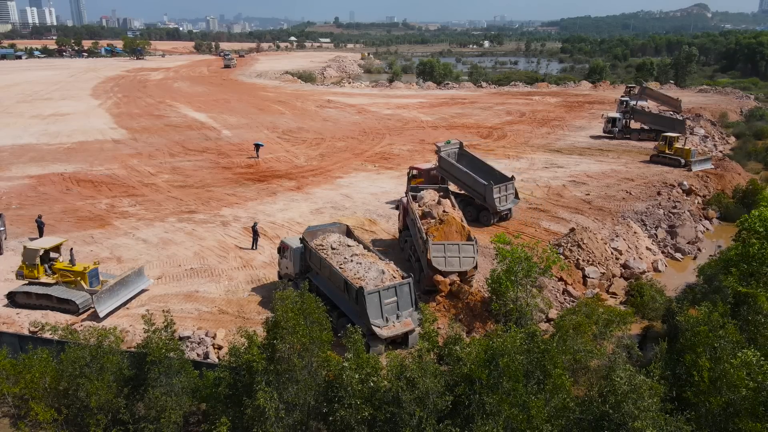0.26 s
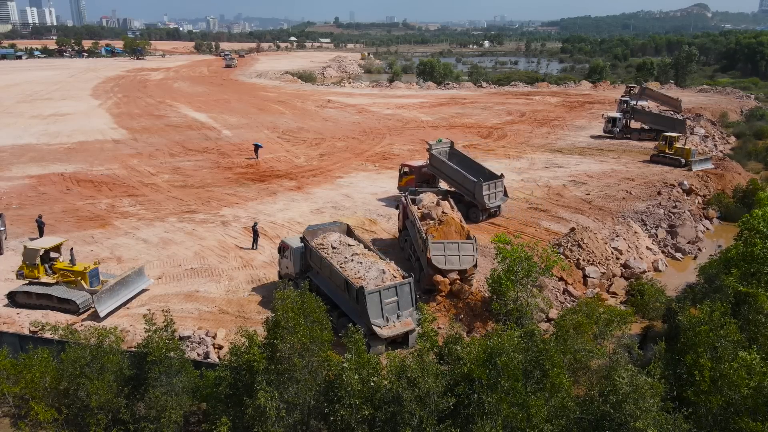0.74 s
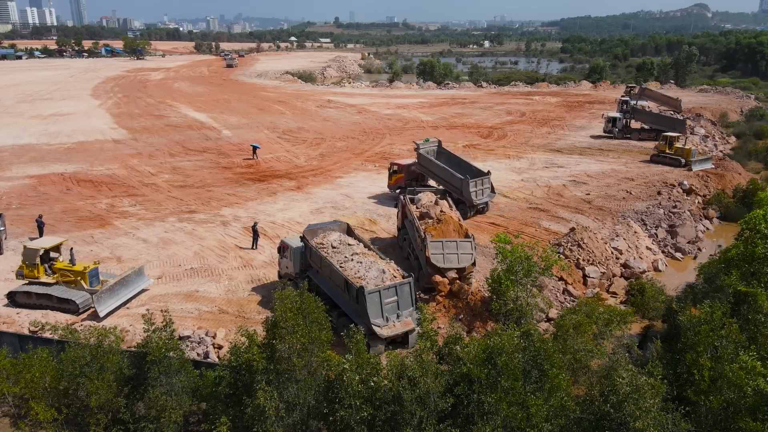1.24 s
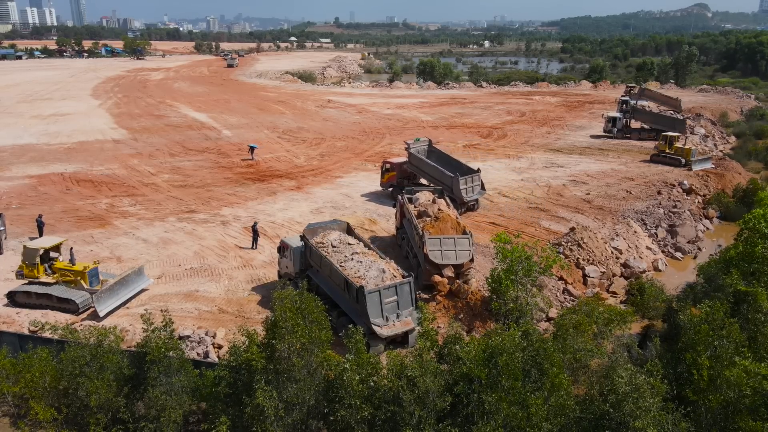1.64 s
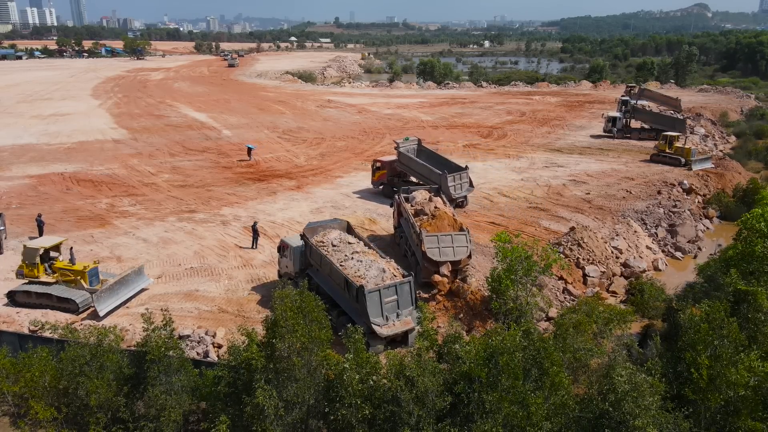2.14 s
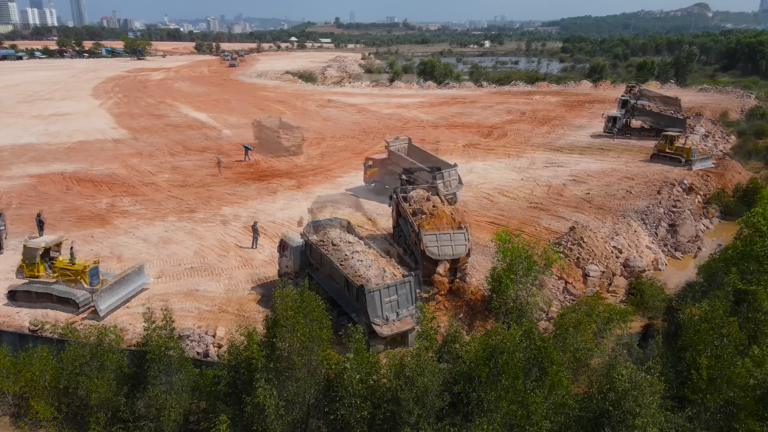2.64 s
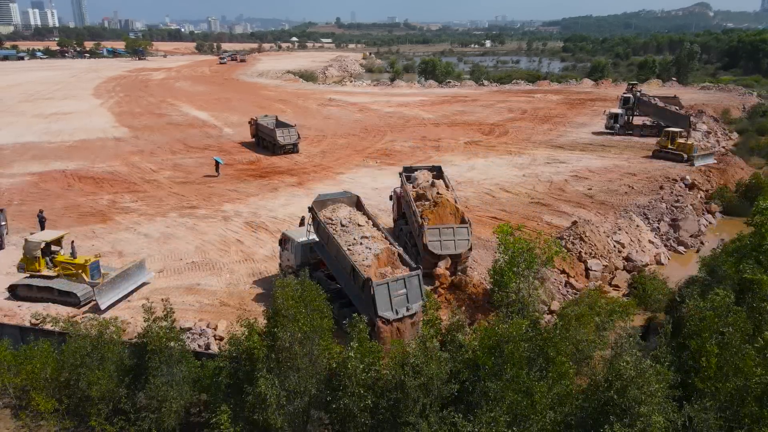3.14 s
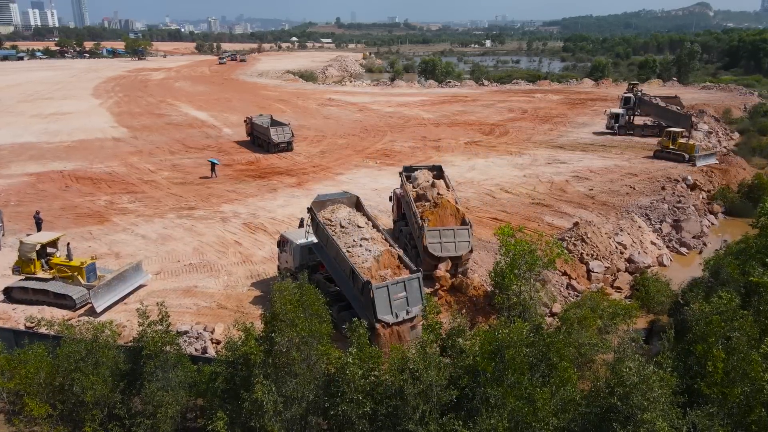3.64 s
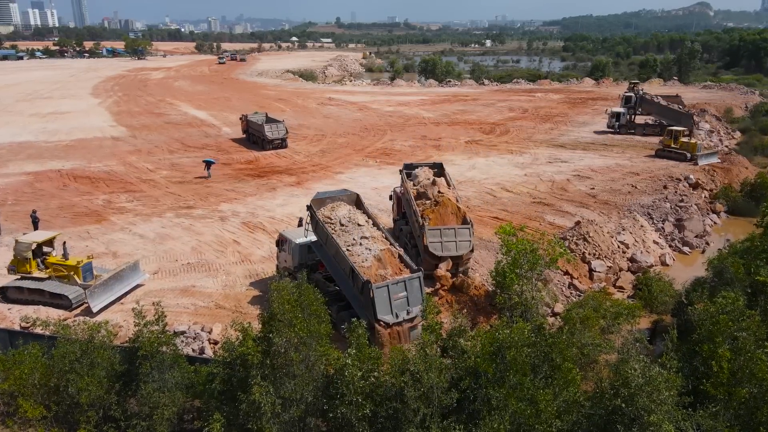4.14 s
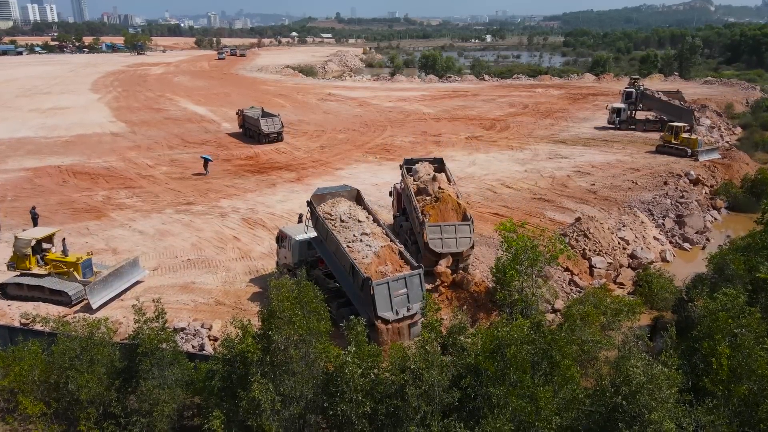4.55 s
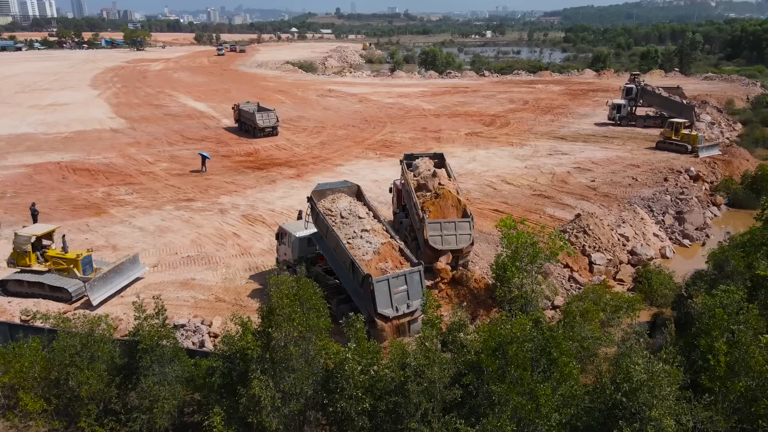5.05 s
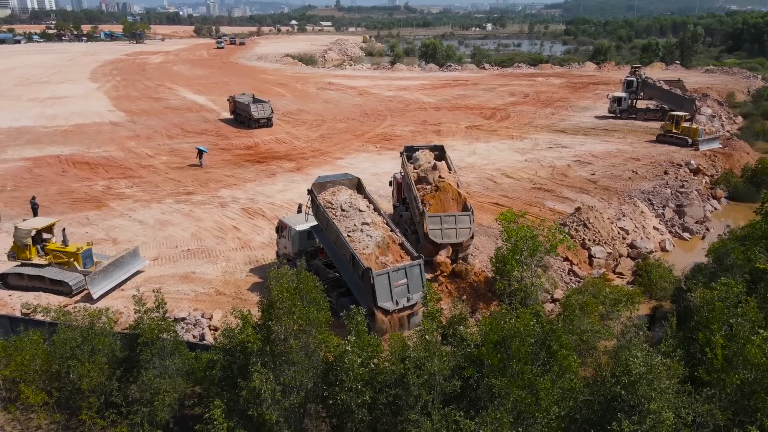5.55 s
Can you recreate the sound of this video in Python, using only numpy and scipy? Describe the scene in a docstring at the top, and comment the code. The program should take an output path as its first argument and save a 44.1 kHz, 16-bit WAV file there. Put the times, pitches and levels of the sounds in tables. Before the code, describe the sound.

Diesel dump trucks idle outdoors while loads of rock and earth scrape down steel beds and crash in heavy heaps.

```python
"""Dump trucks tip rock and earth down a bank on an open site, heard by a stereo microphone.
From the start two six-cylinder diesels throb near idle; blocks clatter and soil hisses off to the right.
Rock scrapes along a steel bed, stones clack, and at 1 s the biggest heap crashes down, boulders thudding
and the truck body booming. A loose tailgate clanks at 2.6 s, just ahead of another heap. Then the rising
bed's hinge squeaks until a last heap lands at 4.8 s. Every fall echoes dully off the earth banks."""
import sys
import numpy as np
from scipy import signal
from scipy.fft import rfft, irfft, next_fast_len
from scipy.io import wavfile
from scipy.ndimage import uniform_filter1d, map_coordinates

SR = 44100
rng = np.random.default_rng(int(sys.argv[2]) if len(sys.argv) > 2 else 0)


def master(y):
    """Save y as 16-bit WAV."""
    cut = np.clip(np.atleast_2d(y).T, -1, 1)
    pcm = np.round(cut * 32767)  # scale
    wavfile.write(sys.argv[1], SR, pcm.astype(np.int16))


N = 255339

# The open site's echo. Each row: frequency in Hz, t60 (time to fall 60 dB) in seconds.
SITE_DECAY = [(100, 0.85), (500, 0.82), (2000, 0.1), (9000, 0.29)]
# The machines stand to the right. Each row: frequency in Hz, lead of the right channel in radians.
RIGHT_LEAD = [(30, 0), (200, 0.1), (690, 2.07), (1400, 3), (2300, 4.5), (4300, 5.5), (6000, 6.5), (7200, 6),
              (8700, 4), (9800, 10), (10700, 8), (11300, 12.5)]
# Stereo width at the microphone. Each row: frequency in Hz, left-right likeness from -1 to 1.
MACHINE_LIKENESS = [(60, 1), (130, 0.88), (270, 0.87), (600, 0.53), (1400, 0.52), (2400, 0.89),
                    (5000, 0.51), (6800, 0.39), (8300, 1), (10300, 1)]
ROCK_LIKENESS = [(150, 1), (350, 0.94), (1000, 0.9), (3000, 0.081), (6500, 0.86), (8800, 0.85),
                 (10000, -0.99)]

# The colour of each noise or pulse. Each row: frequency in Hz, relative spectral density in dB.
SOIL_SPECTRUM = [(1500, -4), (3000, 5.5), (4400, 6), (5500, 4.5), (6600, -1), (8300, 4.5), (10500, 4.5),
                 (11400, -2)]
RUMBLE_SPECTRUM = [(20, -11.5), (35, -8), (50, -1), (70, 5.5), (105, 1.5), (135, -2.5), (175, 2),
                   (250, -15), (400, -18.5), (800, -47.5)]
CLATTER_SPECTRUM = [(130, -29), (220, -3.5), (290, -6), (450, -5.5), (700, -8), (1050, -8), (1500, -13),
                    (2200, -15.5), (3000, -26.5), (4000, -37), (5200, -63), (8800, -68)]
SCRAPE_SPECTRUM = [(180, -5), (300, -3), (520, 2.5), (750, 0.5), (1060, -2.5), (1350, -1), (2200, -5.5),
                   (3200, -17), (4300, -15.5), (8900, -18), (11400, -17)]
GRIND_SPECTRUM = [(1000, -24), (1700, 4), (2200, 8), (2700, 7), (3600, 2), (4400, -8), (5500, -20),
                  (9000, -35)]
STONE_CRUNCH_SPECTRUM = [(600, -0.5), (1250, 6.5), (2200, 1), (3000, -7), (4200, -24), (6000, -31),
                         (11000, -66)]
CLICK_SPECTRUM = [(1500, -36), (3000, 3), (4800, 4.5), (6500, -3.5), (9000, -2.5), (11500, -9)]
PUSH_SPECTRUM = [(25, -29.5), (70, 12.5), (130, 7), (250, -4.5), (600, -10), (1500, -38), (4000, -52),
                 (11000, -74)]
CRACK_SPECTRUM = [(60, -3), (300, -4), (700, 5), (1400, -7.5), (3000, -15), (6000, -15), (11000, -43)]
THUD_SPECTRUM = [(25, -7), (55, -31), (85, -19), (125, 7.5), (170, 1.5), (250, -8), (400, -12.5),
                 (900, -45)]
CLANG_SPECTRUM = [(180, -4.5), (300, 1.5), (480, -0.5), (680, -2.5), (800, -3.5), (1000, -7), (1400, -10.5),
                  (2000, -30), (4000, -71)]
HEAP_CRUNCH_SPECTRUM = [(600, 2.5), (1300, 7.5), (2100, 1.5), (3200, 5), (4200, -9), (6000, -37),
                        (11000, -66)]
SPRAY_SPECTRUM = [(1800, -11), (3500, 1), (5400, 0), (7000, -5.5), (9000, 2), (11400, -7.5)]

# Whine of the tipping pumps. Each row: pitch in Hz, level in dB.
PUMP_TONES = [(421, -52.5), (560, -64), (685, -54)]
# Earth trickling off the beds. Each row: time in seconds, level in dB.
SOIL_LEVELS = [(0, -46.5), (.9, -50), (2.0, -45.5), (2.3, -49), (2.85, -51), (3.9, -47), (4.35, -46.5),
               (4.5, -43.5), (5.1, -47.5), (5.79, -47.5)]
# The rising bed's hinge. Each row: middle in seconds, length in seconds, pitch in Hz, level in dB.
HINGE_SQUEAKS = [(3.285, .08, 4030, -52), (3.3, 0.15, 7960, -55), (3.915, .06, 5650, -53),
                 (3.966, .06, 6380, -56), (4.16, .045, 6280, -50), (4.207, .065, 6230, -48),
                 (4.215, .06, 5950, -54), (4.285, .07, 5730, -53), (4.484, .11, 4080, -50),
                 (4.535, .07, 5560, -53)]
# The farther truck's exhaust. Each row: harmonic of the firing rate, starting level in dB.
FAR_EXHAUST = [(2, -45), (3, -50)]
# The nearest exhaust. Each row: time in seconds, firing rate in Hz, second and third harmonics in dB.
NEAR_EXHAUST = [(0, 30.82, -34.5, -36.5), (1.1, 31.44, -34, -33), (2.2, 30.61, -35, -34.5),
                (4.4, 30.96, -32.5, -38.5), (5.79, 31.04, -31.5, -32.5)]
# Its weaker tones. Each row: multiple of the crankshaft rate, level in dB.
CRANK_ORDERS = [(5, -41), (7, -45.5), (8, -48), (10, -40.5), (11, -62), (12, -46), (15, -46), (16, -54.5),
                (17, -52), (21, -52.5)]
# Resonances of the engine covers and the steel bed. Each row: frequency in Hz, width in Hz, gain in dB.
COVER_MODES = [(558, 44, -7), (730, 91, -6), (810, 56, -26), (2726, 27, -2)]
BED_MODES = [(471, 23, -3), (656, 30, -9), (845, 27, -10), (960, 12, -14), (1113, 25, -3.5),
             (1344, 47, -11), (1626, 44, -7), (1906, 110, -2), (2106, 34, 0.5), (2265, 25, 2.5),
             (2470, 51, -8), (2560, 27, 3), (2980, 28, -10), (3140, 30, -6), (3790, 12, 3), (4140, 36, -22)]

# The tailgate hits its frame. Each row: start in seconds, level in dB.
GATE_BLOWS = [(2.638, -39.5), (2.648, -34), (2.681, -41)]
# The tailgate's ring. Each row: frequency in Hz, relative level in dB, t60 in seconds.
GATE_MODES = [(426.4, 4.5, 0.44), (590, -0.5, 0.67), (715, 0, 0.36), (1030, -16, 0.23), (1510, -20, .15),
              (2100, 4.5, 0.079), (2520, -9, .14), (2900, -6, 0.19), (3460, -18, 0.18)]
# Rock sliding on the bed. Each row: start and length in seconds, level in dB, fade in dB per second.
SLIDES = [(-.06, 0.84, -35.5, 12.5), (0.964, 0.19, -20, 29), (2.857, 0.26, -47, -2),
          (4.732, 0.15, -37.5, 5)]
# Rock grinding over the bed's lip. Each row: start in seconds, level in dB, t60 in seconds.
GRINDS = [(0.713, -43.5, 0.14), (0.981, -27.5, 0.55), (1.11, -34, 0.18), (2.635, -42, 0.09),
          (2.98, -38, 0.13), (4.824, -29, 0.12)]
# The louder single stones. Each row: start in seconds, knock, crunch and click in dB, t60 in seconds.
STONES = [(.062, -36, -35, -45, 0.057), (.124, -28.5, -34, -46, 0.17), (.154, -27, -50, -37.5, .06),
          (.213, -52, -48, -46, .025), (.252, -29, -47, -54, 0.087), (.33, -28, -55, -56, 0.042),
          (.412, -33.5, -40, -49, 0.076), (.476, -37, -36, -40, 0.072), (.484, -38, -47, -48, 0.046),
          (.553, -49, -38, -51, .06), (.64, -38, -39, -52, 0.047), (.692, -49, -45, -47, .04),
          (.712, -60, -37, -64, 0.26), (.771, -35, -59, -39.5, 0.075), (.788, -34.5, -47.5, -53, 0.29),
          (.948, -34, -35, -60, 0.28), (1.054, -41, -22, -24, 0.064), (2.639, -44, -39, -53, 0.041),
          (3.575, -50, -46, -41.5, 0.098), (3.757, -53, -58, -43.5, 0.052),
          (4.117, -48, -39.5, -36.5, 0.16), (4.597, -36.5, -42, -36, 0.1), (4.714, -36, -38.5, -62, 0.12),
          (4.76, -36, -32, -54, 0.35), (4.791, -24, -23.5, -52, 0.072), (4.816, -22, -31, -50, 0.06)]
# Bed panels struck by the heaps. Each row: start in seconds, pitch in Hz, level in dB, t60 in seconds.
PANEL_STRIKES = [(0.157, 484, -28, 0.33), (0.16, 314, -33.5, 1.3), (0.985, 903, -28.5, 0.64),
                 (1.057, 640, -20.5, 0.34), (1.07, 263, -26.5, 0.87), (2.96, 560, -31, 0.27),
                 (4.792, 1226, -27, 0.14), (4.796, 647, -23, 0.23)]
# Booms of the truck body. Each row: start in seconds, lowest mode in Hz, level in dB, t60 in seconds.
BODY_BOOMS = [(1.07, 118.1, -18.5, 0.57), (1.28, 150, -27, 0.3), (1.29, 84.4, -23.5, 0.31),
              (2.99, 132.2, -24.5, 0.64), (4.812, 160.2, -22, .4)]
# The body's modes. Each row: frequency ratio to the lowest, relative level in dB.
BODY_MODES = [(1, 0.5), (1.25, -1.5), (1.955, -10)]
# Boulders landing within the heaps. Each row: start in seconds, push in dB, crack in dB.
BOULDERS = [(0.1591, -17, -18), (0.175, -13.5, -24), (0.189, -16.5, -20), (1.065, -27, -7),
            (1.076, -19, -14), (1.0828, -8, -24), (1.096, -19, -24), (1.1375, -8.5, -28), (1.189, -18, -36),
            (1.317, -23, -44), (2.651, -34, -26), (2.68, -16.5, -38), (2.964, -24, -20),
            (3.004, -14.5, -19), (3.034, -23, -32), (4.798, -21, -19), (4.808, -26, -14), (4.821, -22, -17),
            (4.832, -19, -25), (4.862, -15, -30), (4.891, -15, -26)]
# Heaps crashing down. Each row: start in seconds, thud, clang, crunch and spray in dB, length factor.
HEAPS = [(0.155, -37, -28, -41, -40.5, 0.59), (1.052, -20.5, -22, -21.5, -27.5, 0.99),
         (1.284, -34, -49, -61.5, -70, 0.92), (2.637, -45, -32.5, -43, -44.5, 0.8),
         (2.956, -24, -25.5, -31.5, -37.5, 1.18), (4.789, -22.5, -24.5, -25.5, -37, 0.98)]


def amp(db):
    """Decibels to gain."""
    return 10 ** (np.asarray(db) / 20)


def unit(x):
    """Scale to rms 1."""
    return x / np.sqrt(np.mean(x ** 2) + 1e-20)


def along(points, hz):
    """(Hz, value) points read on a log axis."""
    f, v = np.transpose(points)
    return np.interp(np.log(hz + 1), np.log(f + 1), v)


def curves(rows):
    """One value per sample for each column after the time."""
    times, *columns = np.transpose(rows)
    return [np.interp(np.arange(N) / SR, times, column) for column in columns]


def wobble(rate):
    """A smooth random curve with rate knots a second."""
    return map_coordinates(rng.standard_normal(4096), [np.arange(N) * rate / SR + 2], mode="wrap")


def filtered(x, response):
    """x through a complex frequency response."""
    size = next_fast_len(N + SR // 2)
    return irfft(rfft(x, size) * response(np.fft.rfftfreq(size, 1 / SR)), size)[..., :N]


def coloured(pair, spectrum, likeness=ROCK_LIKENESS):
    """Two unrelated signals become a stereo sound of rms 1 with this spectrum and likeness."""
    def mid_side_gains(hz):
        angle = np.arccos(np.clip(along(likeness, hz), -1, 1)) / 2
        return amp(along(spectrum, hz)) * [np.cos(angle), np.sin(angle)]
    mid, side = filtered(pair, mid_side_gains)
    return unit(np.array([mid + side, mid - side]))


def grit(rate, spread_db):
    """Two noises broken into grains of uneven size, about rate a second."""
    return rng.standard_normal((2, N)) * amp(spread_db * np.clip(wobble(rate), -2, 2))


def patchy(pair, depth_db, size=512):
    """Narrow bands of the noise swell and sink at random, giving an uneven, fluttering texture."""
    bands = signal.stft(pair, nperseg=size)[2]
    swell = uniform_filter1d(rng.standard_normal(bands.shape[1:]), size=4, axis=0)
    swell = uniform_filter1d(swell, size=5, axis=1)
    return signal.istft(bands * amp(depth_db * unit(swell)), nperseg=size)[1][:, :N]


def wavering(x, depth_db, split_hz):
    """The treble of x swells and sinks a few times a second."""
    treble = filtered(x, lambda hz: hz ** 4 / (hz ** 4 + split_hz ** 4))
    return x + treble * (amp(depth_db * wobble(7.6) - 0.67) - 1)


def ringing(x, modes):
    """x plus the answer of each resonance."""
    return filtered(x, lambda f: 1 + sum(
        amp(db) * 1j * f * width / (hz * hz - f * f + 1j * f * width) for hz, width, db in modes))


def from_right(x):
    """The sound reaches the right side of the microphone first."""
    return filtered(x, lambda hz: np.exp(.5j * along(RIGHT_LEAD, hz) * np.array([[-1], [1]])))


def burst(start, rise, t60):
    """An envelope of peak 1 that swells and dies away; times in seconds."""
    t = np.maximum(np.arange(N) / SR - start, 0)
    shape = (1 - np.exp(-(t / rise) ** 2)) * np.exp(-np.log(1000) * t / t60)
    return shape / (shape.max() + 1e-12)


def pulse(spectrum, size=8192):
    """The causal pulse of peak 1 that has this spectrum."""
    cepstrum = irfft(np.log(amp(along(spectrum, np.fft.rfftfreq(size, 1 / SR)))))
    cepstrum[1:size // 2] *= 2
    cepstrum[size // 2 + 1:] = 0
    shape = irfft(np.exp(rfft(cepstrum)))
    return shape / np.abs(shape).max()


def tone(cycles, drift, flutter_db):
    """A sine of rms 1 whose phase (drift, in radians) and level wander."""
    phase = 2 * np.pi * (cycles + rng.random()) + drift * wobble(4)
    return unit(np.sin(phase) * amp(flutter_db * wobble(7)))


def bank_echo(x, delay_s=0.03):
    """Farthest off, the earth banks scatter back a dull tail whose bass is alike in both channels."""
    hz, t, bands = signal.stft(rng.standard_normal((2, N)), SR, nperseg=256)
    decay = np.exp(-np.log(1000) * t / along(SITE_DECAY, hz)[:, None])
    tail = signal.istft(bands * decay, SR, nperseg=256)[1][:, :N]
    tail = coloured(tail, [(60, -2), (160, 6.0), (9000, -0.5)])[:, :SR]
    tail = np.pad(tail / np.linalg.norm(tail[0]), ((0, 0), (round(delay_s * SR), 0)))
    return signal.fftconvolve(x, tail, axes=1)[:, :N]


def pumps():
    """The hydraulic pumps whine faintly and unsteadily in the background."""
    t = np.arange(N) / SR
    return sum(amp(db) * tone(hz * t, drift=1.0, flutter_db=2.0) for hz, db in PUMP_TONES)


def soil():
    """Off to the right, fine earth trickles from the beds in a grainy hiss."""
    grains = patchy(grit(600, spread_db=0.5), depth_db=2.5, size=2048) * amp(1.3 * wobble(23.51))
    return amp(curves(SOIL_LEVELS)[0]) * from_right(coloured(grains, SOIL_SPECTRUM, MACHINE_LIKENESS))


def hinge(sag_per_s=0.12):
    """Dry steel sticks and slips in short, slightly rough chirps that sag in pitch."""
    out = np.zeros(N)
    slips = np.cumsum(rng.normal(0, 0.06, N))  # uneven slipping blurs the pitch
    for middle, length, hz, db in HINGE_SQUEAKS:
        t = np.arange(N) / SR - middle
        active = np.abs(t) < length / 2
        t = t[active]
        cycles = hz * (t - sag_per_s * t ** 2 / 2)
        out[active] += amp(db) * np.cos(np.pi * t / length) * np.sin(2 * np.pi * cycles + slips[active])
    return out


def far_diesel(firing_hz=28.53, gain_db_per_s=0.8):
    """The farther truck idles slower, beats against the near one and grows steadily louder."""
    firings = np.cumsum(firing_hz + 0.668 * wobble(3)) / SR
    swell = amp(gain_db_per_s * np.arange(N) / SR)
    return swell * sum(amp(db) * tone(harmonic * firings, drift=0.99, flutter_db=1.5)
                       for harmonic, db in FAR_EXHAUST)


def near_diesel(hunt_hz=0.099):
    """Exhaust tones lock to the crankshaft; rumble and clatter pulse from the right at each firing."""
    firing_hz, second_db, third_db = curves(NEAR_EXHAUST)
    firings = np.cumsum(firing_hz + hunt_hz * wobble(2.59)) / SR  # the governor lets the rate wander
    turns = firings / 3  # six cylinders fire three times a turn
    exhaust = amp(second_db) * tone(2 * firings, drift=0.45, flutter_db=2.0)
    exhaust += amp(third_db) * tone(3 * firings, drift=0.32, flutter_db=0.5)
    for order, db in CRANK_ORDERS:  # unequal cylinders fill in the other orders
        exhaust += amp(db) * tone(order * turns, drift=0.82, flutter_db=4.0)
    beat = np.cos(2 * np.pi * firings)
    throb = grit(20, spread_db=0.5) * amp(2.3 * beat)
    rumble = amp(-36) * coloured(throb, RUMBLE_SPECTRUM, MACHINE_LIKENESS)
    rattle = patchy(grit(110, spread_db=1.0), depth_db=2.5, size=2048) * amp(0.14 * beat)
    clatter = amp(-37) * coloured(rattle, CLATTER_SPECTRUM, MACHINE_LIKENESS)
    clatter = wavering(clatter, depth_db=2.2, split_hz=2000)
    return exhaust + from_right(rumble + ringing(clatter, COVER_MODES))


def tailgate():
    """Each swing against the frame rings the loose gate anew; the dirt on it blurs and damps its modes."""
    out = np.zeros(N + SR)
    t = np.arange(SR // 2) / SR
    for start, db in GATE_BLOWS:
        for hz, mode_db, t60 in GATE_MODES:
            jitter = 0.069 * np.sqrt(hz / GATE_MODES[0][0])  # radians a sample; higher modes blur more
            phase = 2 * np.pi * (hz * t + rng.random()) + np.cumsum(rng.normal(0, jitter, len(t)))
            envelope = (1 - np.exp(-t / 0.0015)) * np.exp(-np.log(1000) * t / t60)
            level = amp(db + mode_db + rng.normal(0, 2.1))
            out[round(start * SR):][:len(t)] += level * envelope * np.sin(phase)
    return out[:N]


def slides(attack_s=0.023, t60=0.16):
    """Rock scrapes jerkily along the tilted bed: each slide gathers speed, runs on and stops."""
    level = np.zeros(N)
    for start, length, db, fade_db_per_s in SLIDES:
        t = np.maximum(np.arange(N) / SR - start, 0)
        attack = 1 - np.exp(-(t / attack_s) ** 2)
        release = np.exp(-np.log(1000) * np.maximum(t - length, 0) / t60)
        level += amp(db - fade_db_per_s * np.minimum(t, length)) * attack * release
    jerks = amp(0.33 * wobble(33.4))
    scrape = patchy(grit(600, spread_db=1.5), depth_db=5.0)
    return level * jerks * coloured(scrape, SCRAPE_SPECTRUM)


def grinds():
    """Hard rock grates over the steel lip in a short, bright, gravelly crunch."""
    level = sum(amp(db) * burst(start, rise=0.014, t60=t60) for start, db, t60 in GRINDS)
    gravel = patchy(grit(500, spread_db=2.0), depth_db=2.0)
    return level * coloured(gravel, GRIND_SPECTRUM)


def stones(pebble_count=4, pebble_t60=0.2):
    """Stray stones knock on the bed, crunch and scatter chips; so do faint pebbles in the first slide."""
    knock, crunch, click = np.zeros((3, N))
    slide_start, slide_length = SLIDES[0][:2]
    pebble_starts = slide_start + slide_length * rng.random(pebble_count)
    pebble_dbs = rng.normal(-49, 2, pebble_count)
    pebbles = [(start, db + 13.5, db, db, pebble_t60) for start, db in zip(pebble_starts, pebble_dbs)]
    for start, knock_db, crunch_db, click_db, t60 in list(STONES) + pebbles:
        blow = burst(start, rise=0.0022, t60=t60)
        knock += amp(knock_db) * blow
        crunch += amp(crunch_db) * blow
        click += amp(click_db) * burst(start - .002, rise=0.0037, t60=t60)  # the chips' clicks begin a little ahead of the knock
    knocks = knock * coloured(grit(200, spread_db=-3.0), CLANG_SPECTRUM)
    crunches = crunch * coloured(patchy(grit(360, spread_db=1.5), depth_db=4.5), STONE_CRUNCH_SPECTRUM)
    clicks = click * coloured(grit(650, spread_db=1.5), CLICK_SPECTRUM)
    return knocks + crunches + clicks


def panels(width_hz=92):
    """The heaps strike different panels of the bed, and each clangs at its own pitch."""
    out = np.zeros((2, N))
    for start, hz, db, t60 in PANEL_STRIKES:
        spectrum = [(hz / 2, -50), (hz - width_hz, -14), (hz, 0), (hz + width_hz, -14), (2 * hz, -50)]
        clang = coloured(rng.standard_normal((2, N)), spectrum)
        out += amp(db) * burst(start, rise=0.0085, t60=t60) * clang
    return out


def body_booms():
    """The truck's body booms under each heavy landing, each boom at its own low pitch."""
    t = np.arange(N) / SR
    out = np.zeros(N)
    for start, hz, db, t60 in BODY_BOOMS:
        ring = sum(amp(mode_db) * tone(ratio * hz * t, drift=0.52, flutter_db=0.0)
                   for ratio, mode_db in BODY_MODES)
        out += amp(db) * burst(start, rise=0.0083, t60=t60) * unit(ring)
    return out


def boulders():
    """Each boulder gives one dull, heavy push; a hard edge on steel adds a crack that rings the bed."""
    push_hits, crack_hits = np.zeros((2, N))
    for start, push_db, crack_db in BOULDERS:
        push_hits[round(start * SR)] += amp(push_db)
        crack_hits[round(start * SR)] += amp(crack_db)
    pushes = signal.fftconvolve(push_hits, pulse(PUSH_SPECTRUM))[:N]
    cracks = signal.fftconvolve(crack_hits, pulse(CRACK_SPECTRUM))[:N]
    return pushes + ringing(cracks, BED_MODES)


def heaps():
    """Each heap sprays chips, clangs on the bed and crunches; the heavy mass thuds last."""
    thud, clang, crunch, spray = np.zeros((4, N))
    for start, thud_db, clang_db, crunch_db, spray_db, stretch in HEAPS:
        thud += amp(thud_db) * burst(start + 0.016, rise=0.0093, t60=0.56 * stretch)
        clang += amp(clang_db) * burst(start, rise=0.0032, t60=0.51 * stretch)
        crunch += amp(crunch_db) * burst(start, rise=0.0072, t60=0.35 * stretch)
        spray += amp(spray_db) * burst(start, rise=0.00069, t60=0.46 * stretch)
    return (thud * coloured(grit(44, spread_db=-3.5), THUD_SPECTRUM)
            + clang * coloured(grit(200, spread_db=-0.5), CLANG_SPECTRUM)
            + crunch * coloured(patchy(grit(400, spread_db=1.0), depth_db=2.5), HEAP_CRUNCH_SPECTRUM)
            + spray * coloured(grit(700, spread_db=2.2), SPRAY_SPECTRUM))


def scene():
    """Engines and soil lie behind the rock, which rings the steel beds and echoes off the banks."""
    rock = ringing(slides() + heaps() + stones(), BED_MODES)
    rock += panels() + grinds() + boulders() + body_booms() + tailgate()
    background = near_diesel() + far_diesel() + pumps() + soil() + hinge()
    return background + rock + amp(-19.5) * bank_echo(rock)


def record(dry):
    """The recorder behind the microphone keeps nothing above 11.4 kHz."""
    return filtered(dry, lambda hz: hz < 11400)


dry = scene()
out = record(dry)
master(out)
```